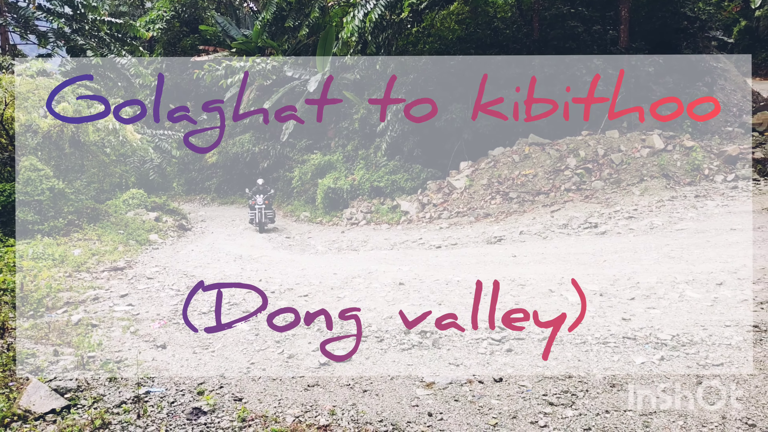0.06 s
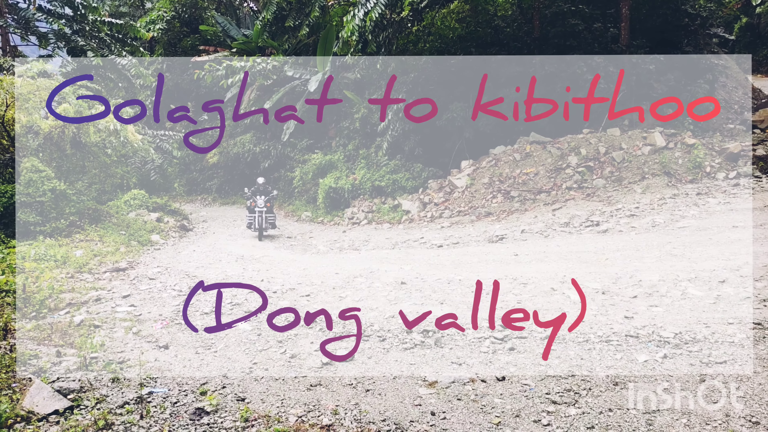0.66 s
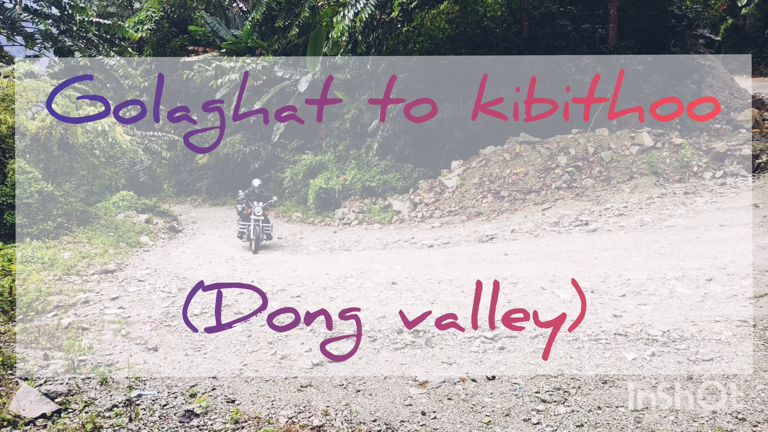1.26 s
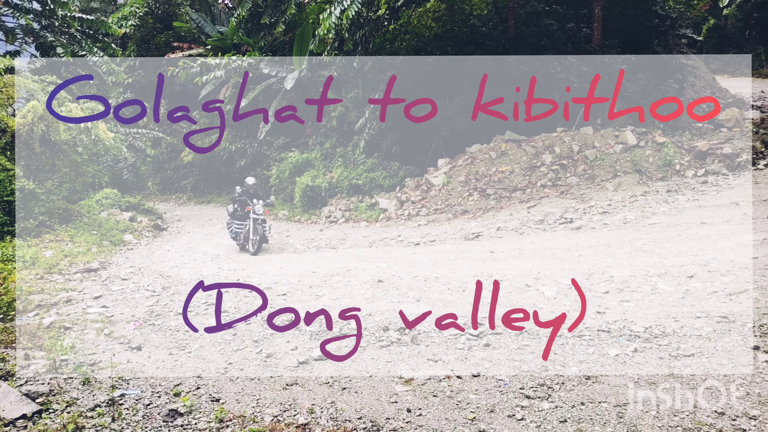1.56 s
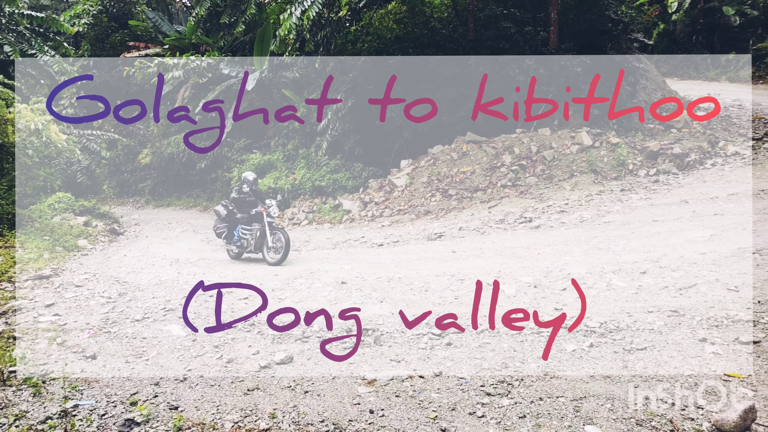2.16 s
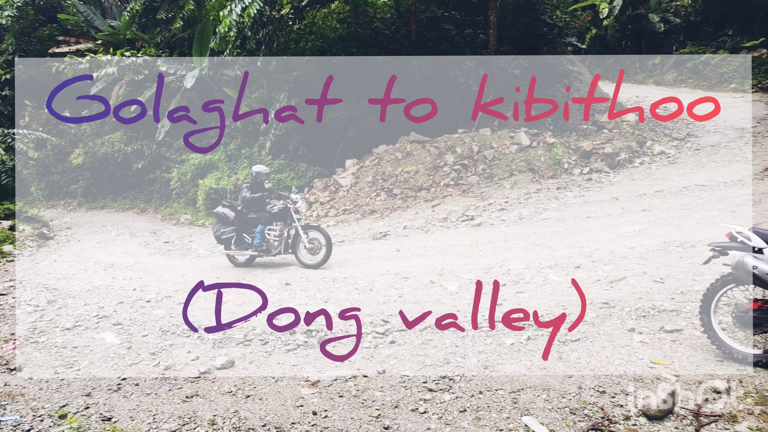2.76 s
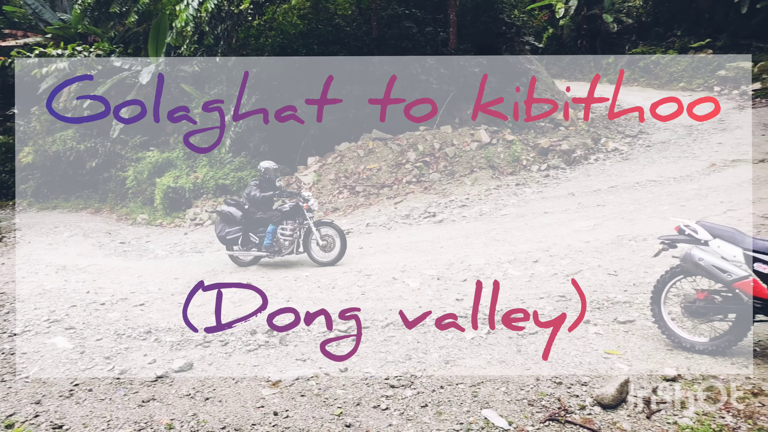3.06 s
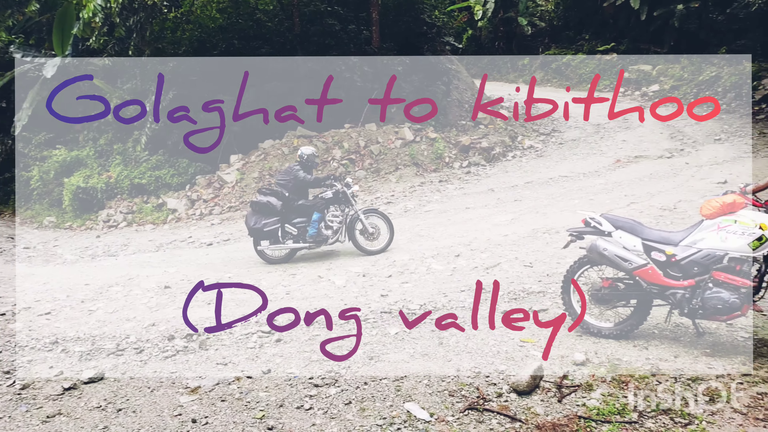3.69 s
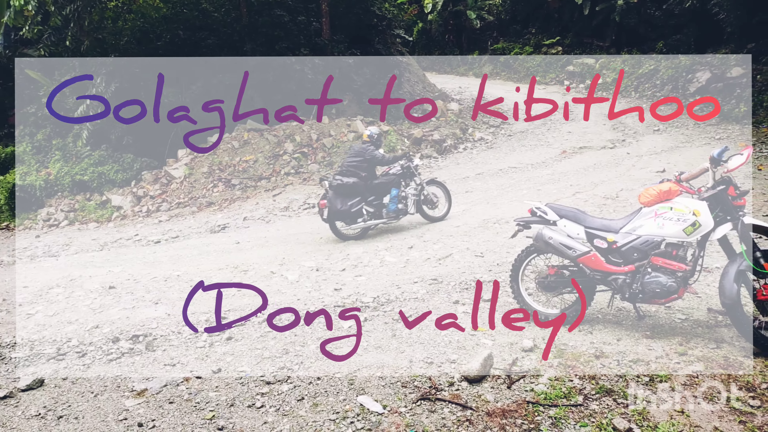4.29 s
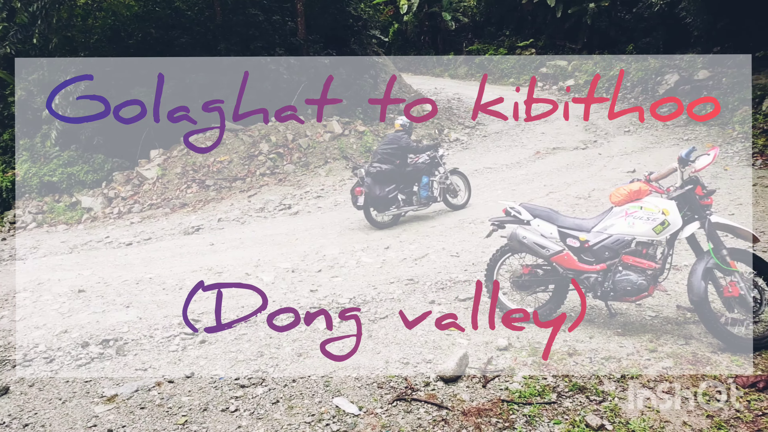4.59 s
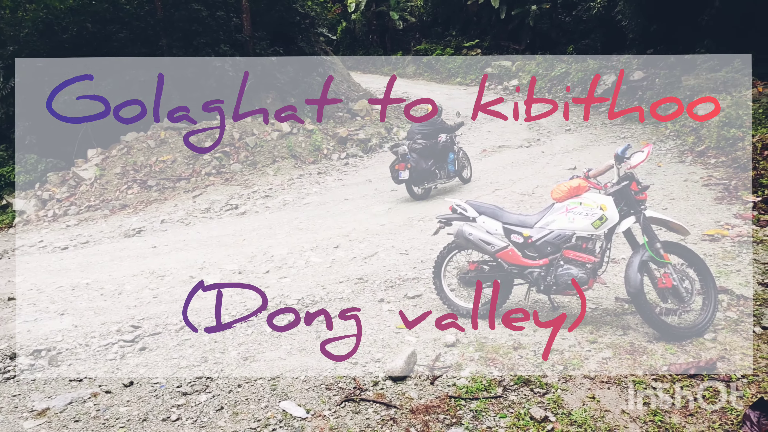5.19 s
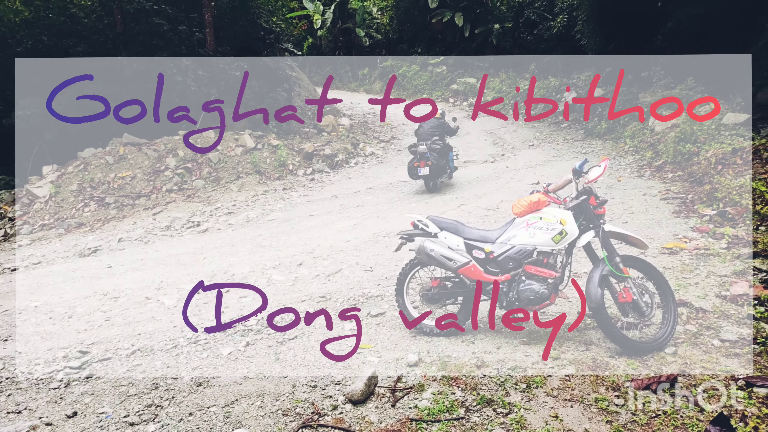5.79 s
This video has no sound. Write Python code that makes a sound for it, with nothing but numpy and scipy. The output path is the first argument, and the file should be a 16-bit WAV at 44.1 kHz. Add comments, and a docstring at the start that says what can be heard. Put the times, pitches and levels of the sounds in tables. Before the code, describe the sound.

A slow, deep motorcycle engine approaches over loose stones, swells as it passes close by and rides on.

```python
"""A big single-cylinder motorcycle thumps slowly up a gravel bend, passes left to right and heads uphill.
Each firing rings the silencer and spits a short jet of gas; under it the engine clatters and the
tyres crunch over loose stones. The bounce off the road sweeps a hollow through the note as it passes.
Behind it the valley rumbles, a small bird squeaks and the hillside scatters the exhaust.
The nearest thumps overload the microphone."""
import sys
import numpy as np
from scipy import signal
from scipy.fft import rfft, irfft, next_fast_len
from scipy.io import wavfile

SR = 44100
rng = np.random.default_rng(int(sys.argv[2]) if len(sys.argv) > 2 else 0)


def persist_wave(psi):
    """Save psi, clipped to +-1, as 16-bit WAV."""
    counts = np.round(np.clip(psi, -1, 1) * 32767).astype(np.int16)
    wavfile.write(sys.argv[1], SR, np.atleast_2d(counts).T)


N = 266364
TIME = np.arange(N) / SR
REFERENCE_M, SOUND_M_PER_S = 8, 343
PIPE_HEIGHT_M, MICROPHONE_HEIGHT_M = 0.592, 1.675

# EQ of the valley's rumble: frequency_hz, gain_db
RUMBLE_EQ = [(20, 19.5), (40, 20.5), (70, 20), (120, 5.5), (250, 7), (500, -4.5), (1000, -8), (2000, -41.5)]
# bird calls: centre_s, pitch_hz, length_s, level_db
BIRD_SQUEAKS = [(2.99, 9500, 0.028, -45), (3.017, 10100, 0.038, -45), (5.095, 9960, .025, -49),
                (5.758, 10400, 0.055, -47)]

# the ride round the bend: time_s, distance_m, side_seen (0 front, 1 flank, 2 behind)
RIDE_PATH = [(0, 19.1, 0.078), (1.9, 14.35, .02), (3.0, 10.84, 0.43), (3.8, 9.2, .92), (4.7, 10.3, 1.7),
             (5.2, 14, 1.83), (6.04, 17.1, 1.92)]
# the pan, as a delay between the channels: time_s, left_lag_s
PAN_LAG = [(0, -.00002), (2.2, -.00004), (3.8, -.00002), (4.8, .00009), (6.04, .00016)]
# engine speed: time_s, firings_per_s
FIRING_RATE = [(0.0, 14.44), (0.208, 16.683), (0.408, 14.723), (1.304, 14.565), (1.495, 15.656),
               (1.706, 14.351), (1.879, 14.839), (2.094, 13.086), (2.511, 14.642), (2.791, 13.188),
               (3.4, 13.164), (3.925, 15.622), (4.294, 15.05), (4.793, 15.069), (5.06, 14.492),
               (5.311, 14.836), (5.552, 14.399), (6.04, 14.771)]
# the rider eases in, shuts off at the apex, pulls past and shuts off again: time_s, opening (0-1)
THROTTLE_MOVES = [(0, 0.3), (1.4, 0.05), (1.68, 0.1), (1.84, 0.32), (1.98, 0), (2.18, 0), (2.42, 0.36),
                  (2.62, 0.28), (3.0, 0.45), (3.47, 0.53), (3.68, 0.84), (4.1, 0.68), (4.55, 0.54),
                  (4.89, 0.53), (5.0, 0.02), (5.12, 0.12), (5.3, 0.55), (5.8, 0.48), (6.04, 0.62)]
# faders by layer, at the reference distance with the throttle shut; "bark" rides on top of "thump":
# front_db, flank_db, behind_db, full_throttle_boost_db
LAYER_MIX = {"thump": (-16, -15, -9, 8), "bark": (-8.5, -17.5, -10.5, 14.5), "jet": (-39, -37.5, -30, 23),
             "clatter": (-36, -35.5, -36.5, 4.5), "tyres": (-38, -42.5, -39.5, 5.5)}

# pebbles snapping under the tyres: start_s, relative_level_db
PEBBLE_SNAPS = [(1.2294, -42), (2.0158, -28), (2.3655, -34), (2.6848, -28), (3.0659, -40), (3.2964, -48)]
# the tyres plough through loose patches: centre_s, boost_db
GRAVEL_PATCHES = [(0.22, 3.5), (1.22, 1), (1.93, 3.5), (2.4, 3), (3.83, 4.5)]
# EQs of the tyres' crunch and the engine's clatter: frequency_hz, gain_db
GRAVEL_EQ = [(1500, -12), (3000, 1), (4200, 1.5), (5800, 0.5), (7500, -2.5), (8600, -11.5), (10000, -21.5),
             (15500, -40)]
CLATTER_EQ = [(300, 5.5), (800, 5.5), (1200, 0.5), (1800, 3), (2400, -4), (3000, -5.5), (4500, -19.5),
              (8000, -22.5)]
# ring of the cylinder fins and covers: pitch_hz, width_hz, relative_level_db
FIN_MODES = [(1970, 110, -24), (2332, 194, -4), (3330, 550, -15), (6000, 520, -23), (7600, 86, -15)]
# EQs of the gas jet from the flank and from behind: frequency_hz, gain_db
JET_FLANK_EQ = [(900, 6), (1250, -16), (1750, 11), (2100, 0), (3400, 9), (4500, 5.5), (6000, 4.5),
                (7000, -1.5), (8000, -1.5), (10000, -15.5), (15500, -17)]
JET_BEHIND_EQ = [(1000, -7), (1500, 12.5), (2000, 0), (2450, 13), (3000, 1.5), (4200, 5.5), (5500, 2),
                 (7500, 4), (10000, -7), (15500, -14)]
# the body of the thump: pitch_hz, width_hz, front_db, flank_db, behind_db
SILENCER_MODES = [(75.6, 8.1, -1.5, -3, -33), (80.4, 52, -4, -1, 0), (140.4, 10.5, -5.5, -8, -11.5),
                  (193.2, 14, -50, -9.5, -26), (243.7, 36, -15, -25, -12.5), (322.5, 42.3, -12.5, -18, -13),
                  (361.3, 16.4, -13.5, -10.5, -18.5), (492, 19.2, -15.5, -16, -20.5),
                  (575.4, 22, -21.5, -28, -29), (619, 32.6, -52, -16.5, -25.5), (716, 19, -18.5, -24, -15),
                  (810, 24.5, -11, -30.5, -18), (899, 11, -80, -21.5, -27.5)]
# each mode's pressure at the pipe mouth: sign
MODE_POLARITY = [1, 1, 1, 1, 1, -1, 1, -1, 1, 1, 1, -1, -1]

# where direct sound and road bounce cancel: front_hz, flank_hz, behind_hz
NOTCH_HZ = (474, 371, 203.5)
# how fully they cancel: time_s, depth (0-1)
NOTCH_DEPTH = [(1.7, 0), (2.05, .98), (3.1, 0.83), (4.9, 0.85), (5.5, 0.5)]
# the two microphone ports colour the treble differently: frequency_hz, left_minus_right_db
PORT_EQ = [(400, 0), (1100, -1), (3100, 1), (4100, -3), (5300, -5), (6800, 0.5), (8900, 9.5), (11500, -1),
           (15000, -2)]


def from_db(db):
    """Decibels to gain."""
    return 10 ** (np.asarray(db) / 20)


def unit_rms(x):
    """Scale to rms 1."""
    return x / np.sqrt(np.mean(x ** 2) + 1e-20)


def automation(rows):
    """Each value column of a timed table, drawn out to every sample."""
    times, *columns = np.transpose(rows)
    return [np.interp(TIME, times, column) for column in columns]


def swell(centre_s, length_s):
    """A bell-shaped fade in and out."""
    return np.exp(-np.minimum((2 * (TIME - centre_s) / length_s) ** 2, 100))


def butter(x, hz, kind, order=2):
    """Butterworth filter."""
    return signal.sosfilt(signal.butter(order, hz, kind, fs=SR, output="sos"), x + 1e-18)


def ring(x, hz, width_hz):
    """A resonator: every click becomes a decaying sine."""
    r, w = np.exp(-np.pi * width_hz / SR), 2 * np.pi * hz / SR
    return signal.lfilter([0, 2 * (1 - r) * np.sin(w)], [1, -2 * r * np.cos(w), r * r], x + 1e-18)


def equalise(x, eq):
    """Filter by a curve of frequency_hz, gain_db."""
    hz, db = np.transpose(eq)
    size = next_fast_len(N + SR // 50)
    bin_hz = np.maximum(np.fft.rfftfreq(size, 1 / SR), 1)
    gain = from_db(np.interp(np.log(bin_hz), np.log(hz), db))
    return irfft(rfft(x, size) * gain, size)[..., :N]


def coloured(x, eq):
    """Equalise, then scale to rms 1."""
    return unit_rms(equalise(x, eq))


def delayed(channel, delay_s):
    """A moving delay line."""
    return np.interp(TIME - delay_s, TIME, channel)


def stereo_noise(shared):
    """White noise with a share of its power common to both channels."""
    white = rng.standard_normal((3, N))
    return np.sqrt(shared) * white[2] + np.sqrt(1 - shared) * white[:2]


def grains(per_s, spread_db):
    """Random clicks, a few much larger than the rest, different in each channel."""
    sizes = from_db(spread_db * np.minimum(rng.exponential(1, (2, N)), 4))
    hits = rng.random((2, N)) < per_s / SR
    return unit_rms(hits * sizes * rng.choice([-1, 1], (2, N)))


def kicks(firings, lead_s, spread_db):
    """One click shortly before each firing, no two equally strong."""
    clicks = np.zeros(N)
    strengths = from_db(spread_db * rng.standard_normal(len(firings)))
    clicks[np.clip(firings - round(lead_s * SR), 0, N - 1)] = strengths
    return clicks


def bursts(firings, lead_s, spread_db, rise_s, fall_s, tail_s, tail_db):
    """An envelope that swells and dies once per engine cycle."""
    t = np.arange(-SR // 40, SR // 15) / SR
    attack = np.exp(-abs(t) / rise_s)
    release = np.hypot(np.exp(-abs(t) / fall_s), from_db(tail_db) * np.exp(-abs(t) / tail_s))
    burst = np.where(t < 0, attack, release)
    return signal.fftconvolve(kicks(firings, lead_s, spread_db), burst)[np.sum(t < 0):][:N]


def facing(front, flank, behind):
    """Crossfade three values by the side that the motorcycle shows."""
    _, side_seen = automation(RIDE_PATH)
    return np.interp(side_seen, [0, 1, 2], [front, flank, behind])


def emitted_db(layer):
    """A layer's level towards the microphone: set by the side seen, raised by the throttle."""
    *side_db, throttle_db = LAYER_MIX[layer]
    return facing(*side_db) + throttle_db * automation(THROTTLE_MOVES)[0]


def heard_db(layer):
    """A layer's level on arrival, its pressure falling as one over distance."""
    distance_m, _ = automation(RIDE_PATH)
    return emitted_db(layer) - 20 * np.log10(distance_m / REFERENCE_M)


def valley_rumble(level_db=-28):
    """A steady bed of low noise, dead centre."""
    return from_db(level_db) * coloured(stereo_noise(shared=1.0), RUMBLE_EQ)


def hillside(x, level_db=-23, t60_s=0.2, low_hz=170):
    """Banks and trees scatter a faint, short tail."""
    t = np.arange(SR // 2) / SR
    envelope = from_db(-60 * t / t60_s) * np.minimum(t / 0.0022, 1)
    echoes = stereo_noise(shared=0.58)[:, :len(t)] * envelope
    echoes /= np.sqrt(np.sum(echoes ** 2, axis=1, keepdims=True))
    send = butter(x, low_hz, "high")
    return from_db(level_db) * signal.fftconvolve(send[None], echoes, axes=1)[:, :N]


def bird(width_hz=900):
    """Thin, hoarse squeaks from the trees: short swells of narrow-band noise."""
    out, air = 0, stereo_noise(shared=0.18)
    for centre_s, hz, length_s, db in BIRD_SQUEAKS:
        voice = unit_rms(butter(air, [hz - width_hz / 2, hz + width_hz / 2], "band"))
        out += from_db(db) * voice * swell(centre_s, length_s)
    return out


def pebbles(trim_db=-8, decay_s=0.0074, band_hz=(3500, 10000)):
    """Now and then a pebble snaps out from under a tyre."""
    gate = sum(from_db(db + trim_db) * (TIME >= start_s) * np.exp(-abs(TIME - start_s) / decay_s)
               for start_s, db in PEBBLE_SNAPS)
    return gate * butter(stereo_noise(shared=0.35), band_hz, "band")


def tyres(trim_db=-0.44, crunch_db=-3, patch_s=0.25):
    """The tyres grind over grit, louder through each loose patch."""
    boost_db = sum(db * swell(centre_s, patch_s) for centre_s, db in GRAVEL_PATCHES)
    grit = stereo_noise(shared=0.21) + from_db(crunch_db) * grains(per_s=700, spread_db=4.5)
    return from_db(heard_db("tyres") + boost_db + trim_db) * coloured(grit, GRAVEL_EQ)


def engine_clatter(firings, clatter_db=-1, fins_db=-2, knock_depth=0.6):
    """Piston and valve gear rattle the fins and covers."""
    # the valve gear clatters in a short burst shortly before each exhaust pulse
    knock = bursts(firings, lead_s=0.013, spread_db=2.5,
                   rise_s=0.002, fall_s=0.006, tail_s=0.012, tail_db=-3)
    clatter = from_db(clatter_db) * coloured(stereo_noise(shared=0.31), CLATTER_EQ)
    rattle = stereo_noise(shared=0.6) + grains(per_s=260, spread_db=5)
    fins = sum(from_db(db + fins_db) * unit_rms(ring(rattle, hz, width_hz))
               for hz, width_hz, db in FIN_MODES)
    return from_db(heard_db("clatter")) * (1 + knock_depth * knock) * (clatter + fins)


def pipe_whistle(firings, level_db=-22, pitch_hz=5950, width_hz=450, beam_side=1.14, beam_width=0.39):
    """The jet rings the mouth of the pipe: a metallic spit, beamed out sideways, that sweeps past."""
    _, side_seen = automation(RIDE_PATH)
    gate = bursts(firings, lead_s=0.0031, spread_db=2.5,
                  rise_s=0.001, fall_s=0.0034, tail_s=0.025, tail_db=-10)
    beam = np.exp(-((side_seen - beam_side) / beam_width) ** 2)
    metal = unit_rms(ring(stereo_noise(shared=0.28), pitch_hz, width_hz))
    return from_db(level_db) * beam * gate * metal


def road_bounce(hiss, firings, gain=0.51, roughness=0.15):
    """The reflection off the road combs the hiss, lagging more the nearer the pipe is."""
    distance_m, _ = automation(RIDE_PATH)
    delay_s = 2 * PIPE_HEIGHT_M * MICROPHONE_HEIGHT_M / (distance_m * SOUND_M_PER_S)
    # the rough road shifts the bounce from one firing to the next
    bumps = np.interp(TIME, TIME[firings], rng.standard_normal(len(firings)))
    delay_s *= 1 + roughness * bumps
    return hiss + gain * np.array([delayed(channel, delay_s) for channel in hiss])


def road_notch(x, half_width_hz=50):
    """Direct sound and road bounce cancel in a hollow that slides down as the motorcycle passes."""
    depth, = automation(NOTCH_DEPTH)
    carrier = np.exp(2j * np.pi * np.cumsum(facing(*NOTCH_HZ)) / SR)
    # shift the moving band down to 0 Hz, isolate it and shift it back
    band = 2 * np.real(carrier * butter(x / carrier, half_width_hz, "low", order=1))
    return x - depth * band


def jet_hiss(firings, trim_db=1.17, lift_db_per_m=0.18):
    """Gas tears out of the pipe at the peak of each pulse: a short hiss, brighter from behind."""
    distance_m, side_seen = automation(RIDE_PATH)
    gate = bursts(firings, lead_s=0.0028, spread_db=0.5,
                  rise_s=0.0016, fall_s=0.0029, tail_s=0.019, tail_db=-12.5)
    behind = np.clip(side_seen - 1, 0, 1)
    gas = stereo_noise(shared=0.54)
    hiss = (1 - behind) * coloured(gas, JET_FLANK_EQ) + behind * coloured(gas, JET_BEHIND_EQ)
    # the hiss fades with distance a little more slowly than the thump
    level_db = heard_db("jet") + trim_db + lift_db_per_m * (distance_m - REFERENCE_M)
    return from_db(level_db) * gate * hiss


def jet_chuff(firings, trim_db=-21, shadow_db=-6, band_hz=(350, 820)):
    """A low puff of turbulence with each pulse, shadowed from the front by the motorcycle's body."""
    gate = bursts(firings, lead_s=0.003, spread_db=1.4,
                  rise_s=0.003, fall_s=0.02, tail_s=0.035, tail_db=-13)
    turbulence = unit_rms(butter(stereo_noise(shared=0.58), band_hz, "band", order=3))
    level_db = heard_db("thump") + emitted_db("bark") + trim_db + facing(shadow_db, 0, 0)
    return from_db(level_db) * gate * turbulence


def firing_samples(start_cycles=0.5179):
    """The samples at which the exhaust valve blows down, once per engine cycle."""
    cycles = start_cycles + np.cumsum(automation(FIRING_RATE)[0]) / SR
    return np.flatnonzero(np.diff(np.floor(cycles))) + 1


def exhaust_thump(firings, drive_db=63, mouth_hz=740, leak_db=-21, crack_db=-27):
    """Each blowdown rings the silencer; an open throttle steepens the pulse and feeds the upper modes."""
    thump_db, bark_db = heard_db("thump"), emitted_db("bark")
    body = 0
    for (hz, width_hz, *side_db), sign in zip(SILENCER_MODES, MODE_POLARITY):
        # higher modes take more of the bark and vary more from hit to hit
        bark_share = np.clip(np.log2(hz / 70) / 3, 0, 1) ** 1.5
        pulse = kicks(firings, lead_s=0.0044, spread_db=0.2 + 1.2 * bark_share)
        # a little gas leaks ahead of the main pulse as the valve lifts
        leak = from_db(leak_db) * kicks(firings, lead_s=0.0082, spread_db=2)
        gain = from_db(thump_db + facing(*side_db) + bark_share * bark_db)
        body += sign * ring(gain * (pulse + leak), hz, width_hz)
    # the header pipe rings as the valve cracks open
    crack = kicks(firings, lead_s=0.0084, spread_db=4.5) * from_db(thump_db + bark_db + crack_db)
    header = ring(crack, hz=800, width_hz=130)
    return from_db(drive_db) * butter(body + header, mouth_hz, "low", order=4)


def scene():
    """The motorcycle crosses from left to right over the low rumble of the valley."""
    firings = firing_samples()
    thump = exhaust_thump(firings)
    jet = road_bounce(jet_hiss(firings), firings) + jet_chuff(firings)
    motorcycle = road_notch(thump + jet + engine_clatter(firings) + tyres())
    surroundings = valley_rumble() + hillside(thump) + pebbles() + bird()
    left, right = motorcycle + pipe_whistle(firings)
    lag_s, = automation(PAN_LAG)
    return surroundings + np.array([delayed(left, lag_s / 2), delayed(right, -lag_s / 2)])


def record(dry, low_cut_hz=77, high_cut_hz=16000, clip_hardness=16):
    """The microphone: its ports colour each side, deep bass drops out, peaks flatten, the top is cut."""
    ported = np.array([equalise(channel, [(hz, side * db / 2) for hz, db in PORT_EQ])
                       for channel, side in zip(dry, (1, -1))])
    thinned = butter(ported, low_cut_hz, "high", order=4)
    clipped = thinned / (1 + abs(thinned) ** clip_hardness) ** (1 / clip_hardness)
    high_cut = signal.ellip(10, 0.05, 70, high_cut_hz, fs=SR, output="sos")
    return signal.sosfiltfilt(high_cut, clipped)


dry = scene()
out = record(dry)
persist_wave(out)
```